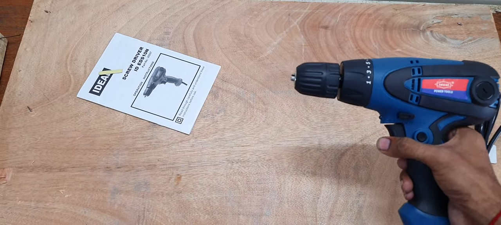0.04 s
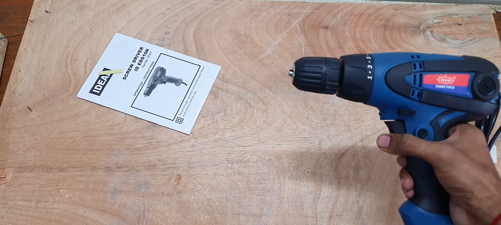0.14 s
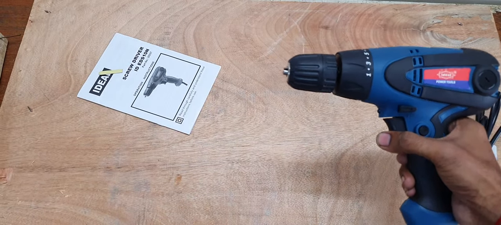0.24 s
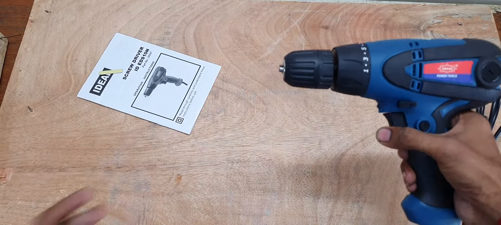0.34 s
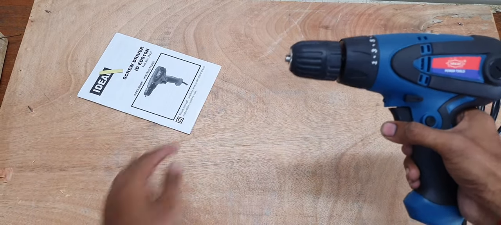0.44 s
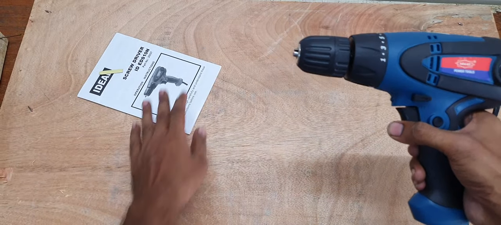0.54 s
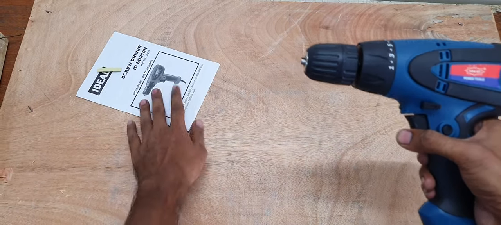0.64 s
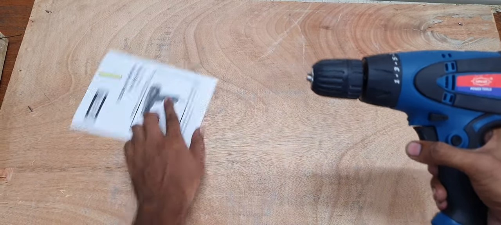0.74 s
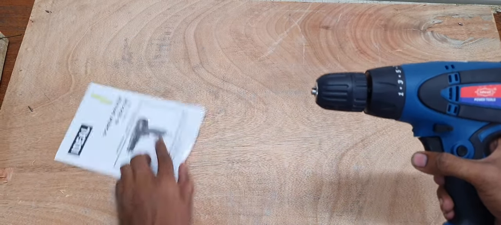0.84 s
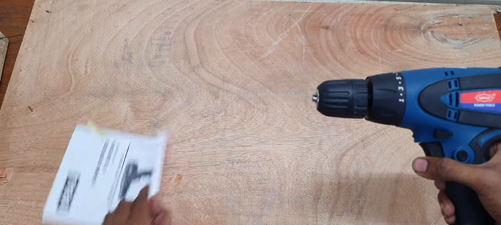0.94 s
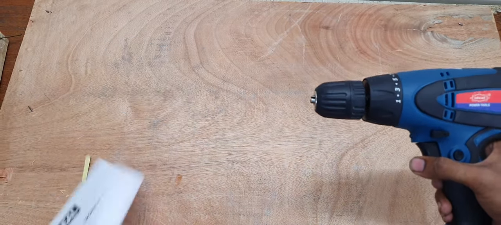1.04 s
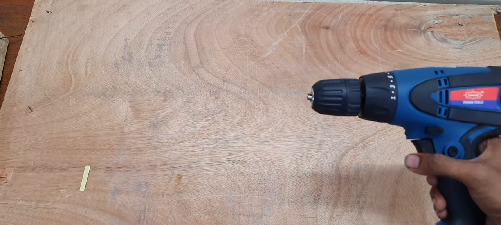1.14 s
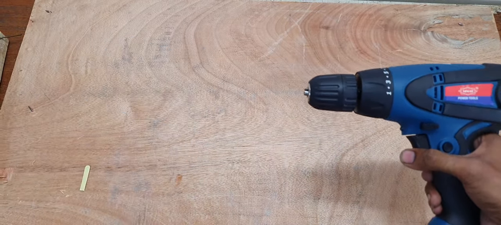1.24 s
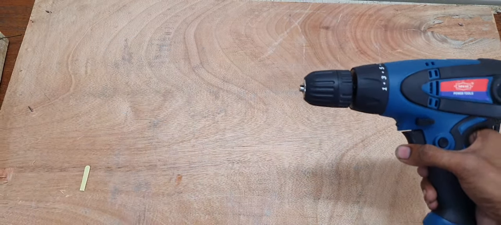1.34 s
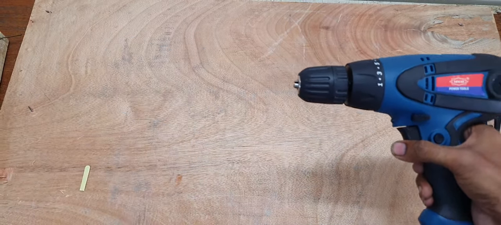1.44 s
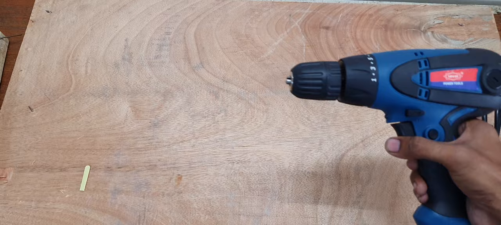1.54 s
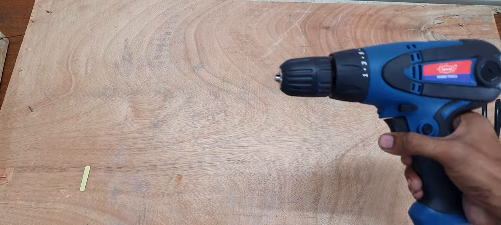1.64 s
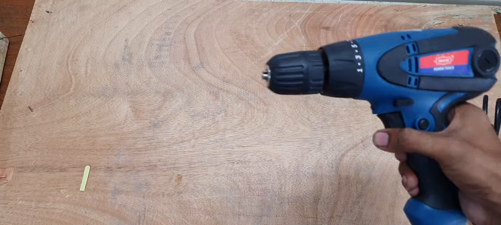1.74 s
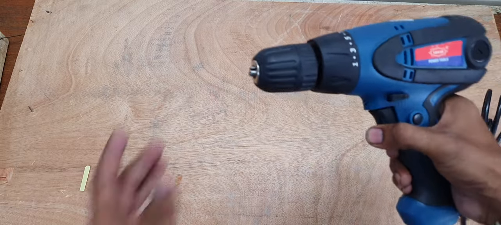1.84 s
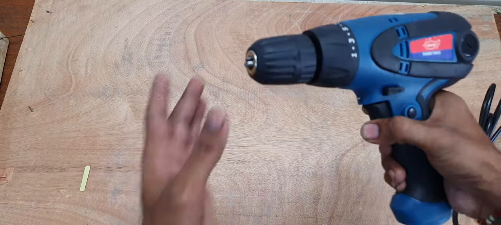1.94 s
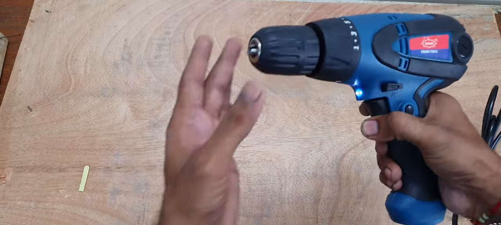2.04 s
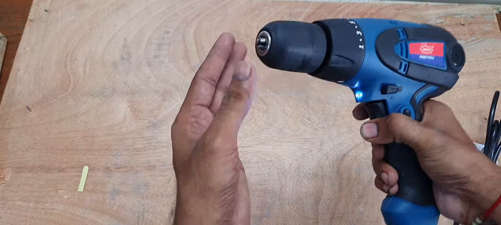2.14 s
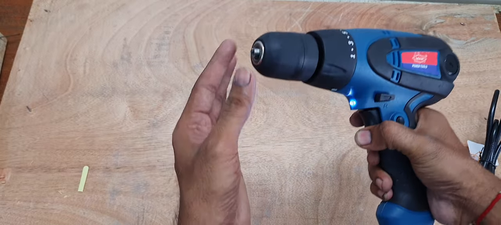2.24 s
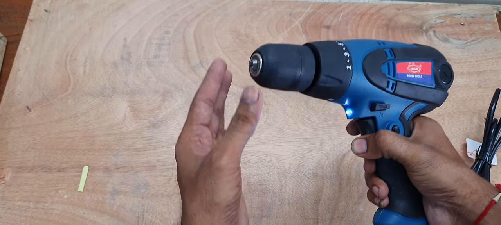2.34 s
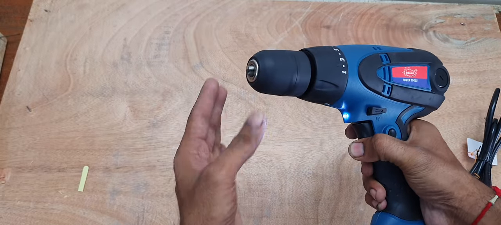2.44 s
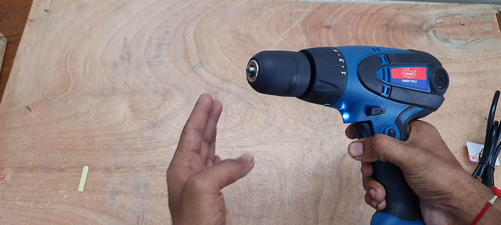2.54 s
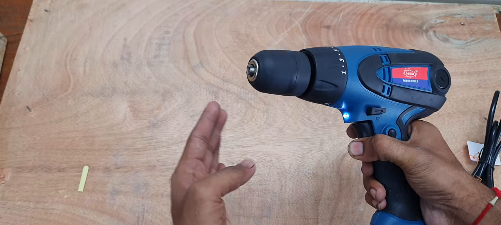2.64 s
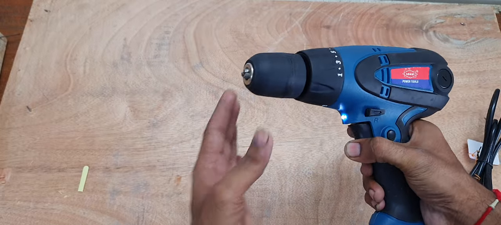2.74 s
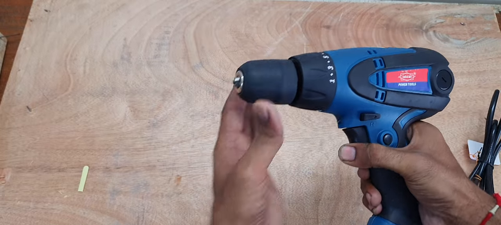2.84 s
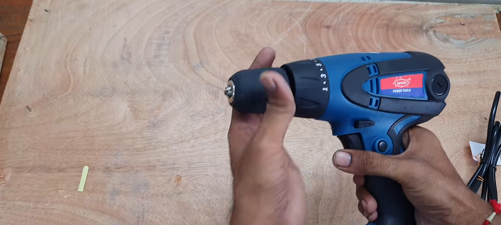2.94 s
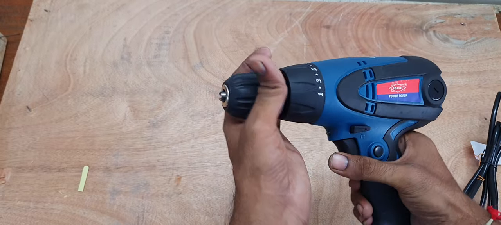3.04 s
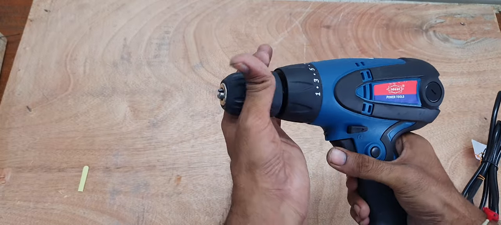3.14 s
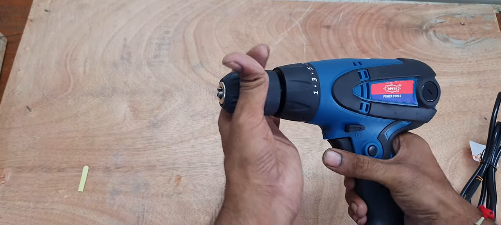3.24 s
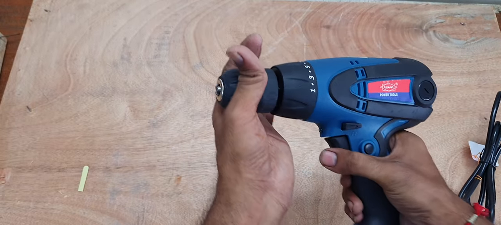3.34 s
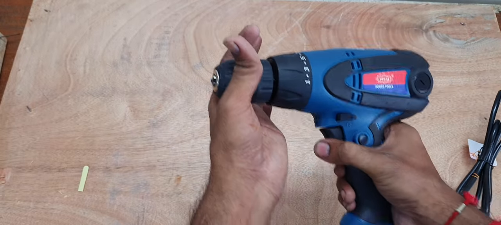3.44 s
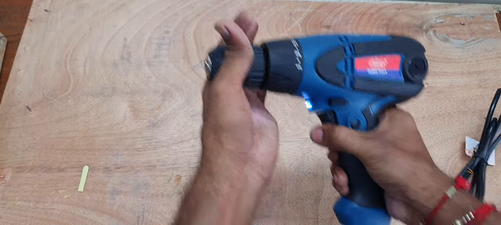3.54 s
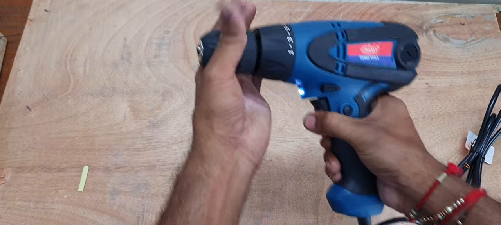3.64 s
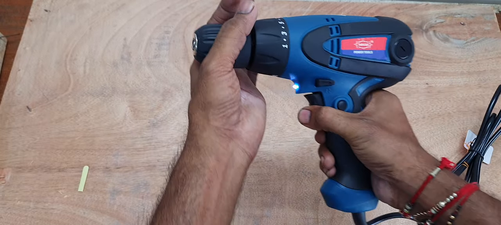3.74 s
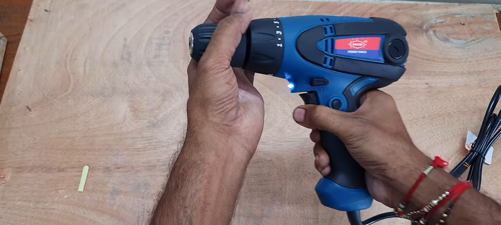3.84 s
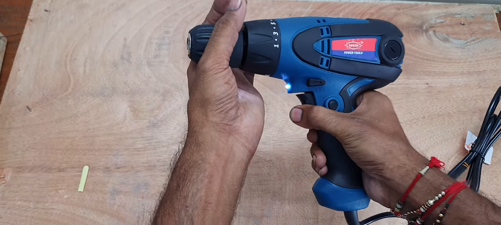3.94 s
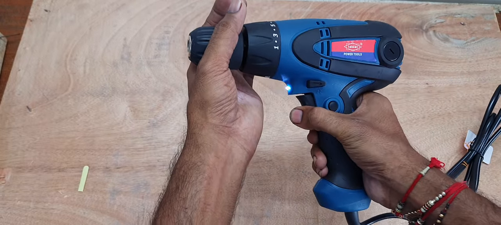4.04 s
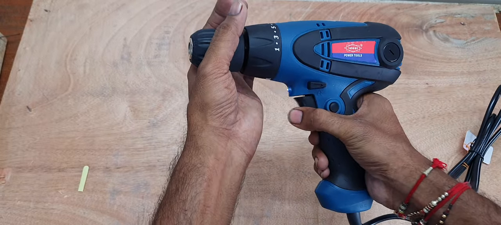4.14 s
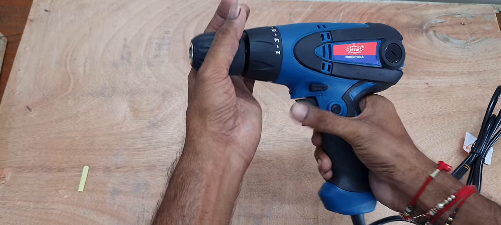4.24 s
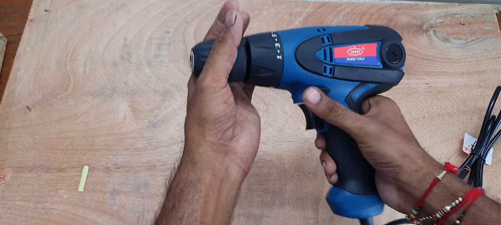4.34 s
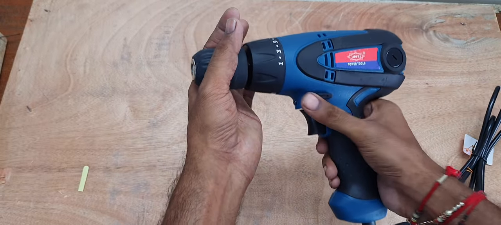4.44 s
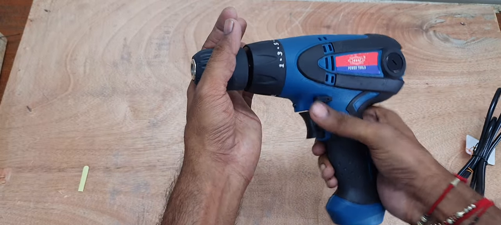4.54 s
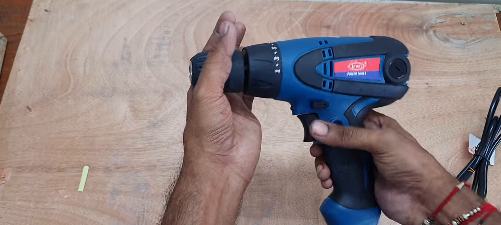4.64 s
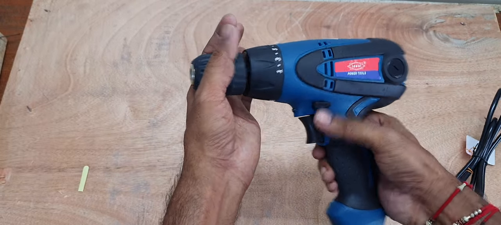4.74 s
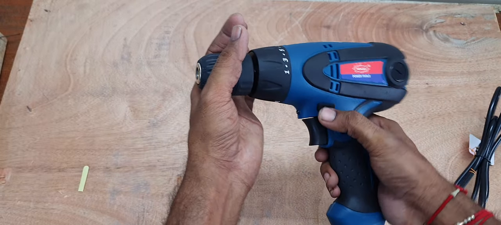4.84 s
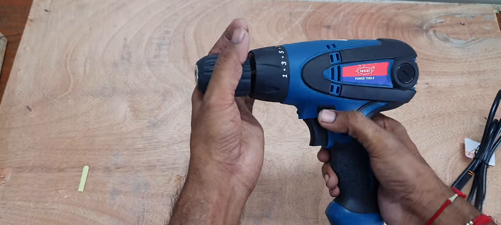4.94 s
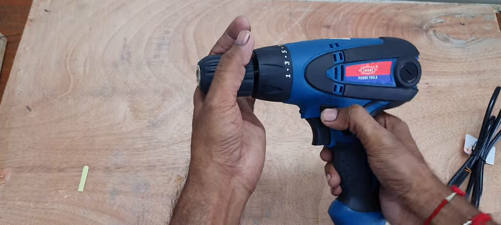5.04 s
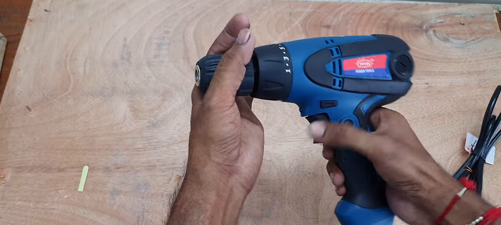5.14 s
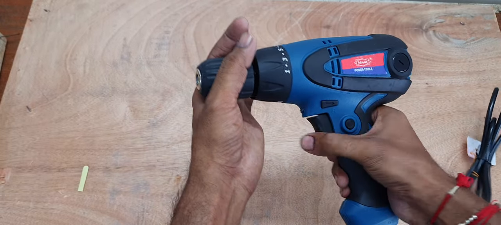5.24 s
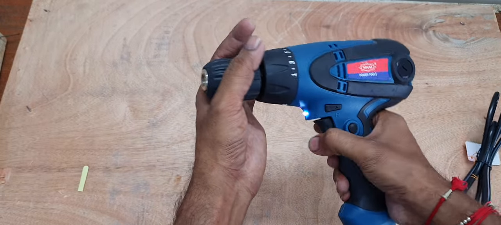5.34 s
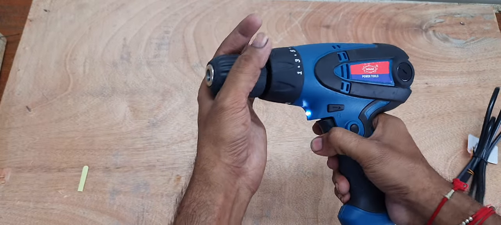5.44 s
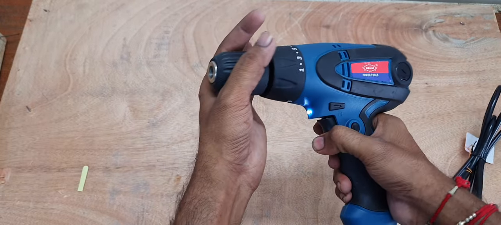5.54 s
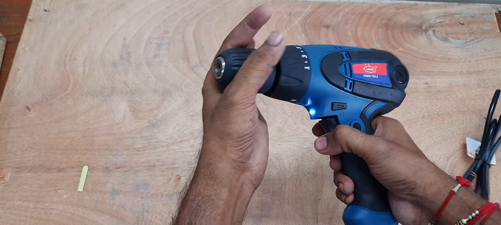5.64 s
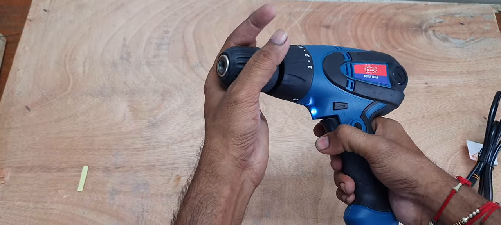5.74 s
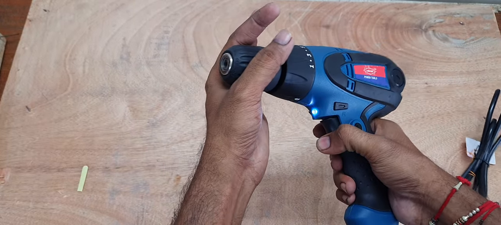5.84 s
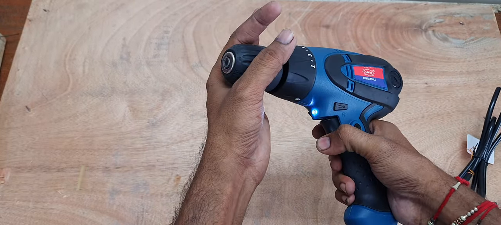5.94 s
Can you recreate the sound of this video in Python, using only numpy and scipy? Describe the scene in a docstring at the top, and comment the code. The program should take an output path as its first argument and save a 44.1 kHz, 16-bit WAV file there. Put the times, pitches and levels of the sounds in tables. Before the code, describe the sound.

A small room rumbles low and steadily throughout. From about 0.2 to 0.5 seconds, a quick cluster of dull knocks rings a wooden table. A paper leaflet slides with a grainy hiss from 0.7 seconds and snaps near 1 second, with faint handling clicks around 1.8.

At 2.1 seconds a trigger clicks and a nearby corded drill spins up without load: a rising, pulsing motor whine with rasping gears, hiss and rushing air. Released at 2.8, it coasts down into a duller rattle. A second, slower burst runs from 3.6 to 4.2 seconds, then winds down to a stop at about 5, leaving a faint thin squeal around standstill. Near 5.4 seconds a light click starts the third burst, the fastest and highest in pitch, which is still running when the sound ends at 6 seconds.

```python
"""A small room rumbles throughout. Dull knocks ring a wooden table, then a paper leaflet slides and snaps.
A corded drill-driver, held over the table, is triggered three times without load: gear teeth rasp,
brushes hiss, the fan rushes and the motor whines in mains pulses. It coasts after the first two pulls,
leaving a thin squeal around standstill. The third pull is the fastest and runs to the end."""
import sys
import numpy as np
from scipy import signal
from scipy.fft import rfft, irfft
from scipy.io import wavfile
from scipy.ndimage import map_coordinates

SR = 44100
rng = np.random.default_rng(int(sys.argv[2]) if len(sys.argv) > 2 else 0)


def put_to_file(sound):
    """Save the sound as 16-bit audio at rate SR, in the file named by the first command-line argument."""
    columns = np.atleast_2d(sound).T  # one column per channel
    safe = np.clip(columns, -1, 1)
    whole_steps = np.round(safe * 32767)
    wavfile.write(sys.argv[1], SR, whole_steps.astype(np.int16))


N = 263277
TIME = np.arange(N) / SR
FREQS = np.maximum(np.arange(N // 2 + 1) * SR / N, 1)
MESH_PER_TURN = 7.5

# trigger pulls: press_s, release_s, aim_rps, spin_up_s, squeeze_s
TRIGGER_PULLS = [(2.09, 2.761, 308.5, .24, .002), (3.56, 4.156, 255, .231, .017),
                 (5.374, 6.0, 436, .18, .034)]
# fixed peaks and dips that give the drill its hollow tone: centre_hz, width_hz, lift_db
DRILL_COLOUR = [(930, 35, 6), (2370, 460, 1), (3010, 140, 5), (3340, 260, 0), (3820, 360, 5.5),
                (4300, 230, -2), (5800, 350, 2), (7000, 430, -1)]


def from_db(db):
    """Decibels to gain."""
    return 10 ** (np.asarray(db) / 20)


def rms_one(x):
    """Scale to rms 1."""
    return x / np.sqrt(np.mean(x ** 2) + 1e-20)


def response(spectrum, peaks=()):
    """Gain per frequency: a smooth spectrum plus peaks and dips, rolled off past both ends."""
    hz, db = np.transpose(spectrum)
    smooth_db = np.interp(np.log(FREQS), np.log(hz), db)
    lift_db = sum(lift / (1 + (2 * (FREQS - centre) / width) ** 2) for centre, width, lift in peaks)
    roll_off = np.minimum(FREQS / hz[0], 1) ** 2 * np.minimum(hz[-1] / FREQS, 1) ** 2
    return from_db(smooth_db + lift_db) * roll_off


def colour(x, gain):
    """Filter by a gain per frequency."""
    return irfft(rfft(x) * gain, N)


def band(x, hz, kind):
    """Second-order Butterworth filter."""
    sos = signal.butter(2, np.clip(hz, 10, .45 * SR), kind, fs=SR, output="sos")
    return signal.sosfilt(sos, x + 1e-18)


def drift(rate_hz):
    """Random wander, rms 1."""
    return rms_one(colour(rng.standard_normal(N), 1 / (1 + (FREQS / rate_hz) ** 2)))


def saturate(speed_rps, knee_rps):
    """Grows with speed, levels off at 1 above the knee."""
    return speed_rps / np.hypot(speed_rps, knee_rps)


def room_rumble(level_db=-38, pan_db=2.0):
    """Steady rumble: alike at both microphones in the bass, less so in the treble."""
    # background spectrum: freq_hz, level_db
    spectrum = [(15, -46), (25, -39), (47, -2.5), (74, 0), (180, -12), (242, -14.5), (285, -13.5),
                (335, -15), (476, -15.5), (1070, -22.5), (1230, -26.5), (1560, -27.5), (2990, -30.5),
                (7110, -42.5), (16000, -49.5)]
    # standing waves: centre_hz, width_hz, lift_db
    room_modes = [(76.4, 33, 2.5), (106, 13, 5), (194, 79, -7), (280.4, 23, 6.5), (405, 12.6, 7.5),
                  (490, 14.5, 6), (568, 24, 2)]
    gain = response(spectrum, room_modes)
    spread = 0.063 + 1.6 * FREQS / (FREQS + 1200)
    mid = colour(rng.standard_normal(N), gain)
    side = colour(rng.standard_normal(N), gain * spread)
    stereo = (mid + side * [[1], [-1]]) / mid.std()
    return from_db(level_db) * stereo * from_db([[pan_db / 2], [-pan_db / 2]])


def knocks(gain_db=-2.0, crack_db=-4.5, crack_s=0.039, thump_db=-19.5, thump_hz=95, thump_s=0.025):
    """Soft blows ring the table's modes, each in its own mix, over a low thump and a dying crack."""
    # blows on the table: start_s, level_db, brightness_hz
    blows = [(0.181, -7, 880), (.201, -6.5, 557), (.263, -16, 1900), (.277, -22, 2400), (.309, -11, 520),
             (.375, -21.5, 805), (.425, -12, 980), (.446, -19.5, 1300), (0.492, -19, 600),
             (0.513, -26.5, 1800)]
    # wood modes: pitch_hz, level_db, t60_s
    table_modes = [(115, -19, 0.19), (271.3, -9.5, 0.17), (356, -4.5, 0.033), (393, -6, 0.066),
                   (463, -6, 0.053), (556.7, -8, 0.12), (674, -12, 0.033), (825, -15, 0.023),
                   (970, -5, 0.021), (1230, -10.5, 0.071), (1520, -13, 0.043), (1805, -8.5, 0.057),
                   (2160, -26, 0.049), (2745, -29, 0.045)]
    # contact crack: freq_hz, level_db
    crack_spectrum = [(60, -4), (120, 11.5), (190, -20), (300, 10.5), (1500, -1), (2300, -7.5),
                      (3200, -11.5), (5000, -19.5), (8000, -29.5), (15000, -30)]
    t, body, cracks = TIME[:SR // 2], np.zeros(N), np.zeros(N)
    hz, mode_db, t60_s = np.transpose(table_modes)[:, :, None]
    polarity = (-1) ** np.arange(len(hz))[:, None]
    thump = from_db(thump_db) * np.sin(2 * np.pi * thump_hz * t) * np.exp(-t / thump_s)
    for start_s, level_db, brightness_hz in blows:
        strength = polarity * from_db(mode_db + rng.normal(0, 2.7, hz.shape))
        ring = np.sum(strength * from_db(-60 * t / t60_s) * np.sin(2 * np.pi * hz * t), axis=0)
        burst = rng.standard_normal(len(t)) * np.exp(-t / crack_s)
        span = slice(int(start_s * SR), int(start_s * SR) + len(t))
        body[span] += from_db(level_db) * (band(ring, brightness_hz, "low") + thump)
        cracks[span] += from_db(level_db + crack_db) * brightness_hz / 1000 * burst
    return from_db(gain_db) * (body + colour(cracks, response(crack_spectrum)))


def snaps(decay_s=0.0039, gain_db=4.0):
    """Paper snaps and the grip clicks: short broad noise bursts."""
    # snaps and clicks: start_s, level_db, centre_hz
    clicks = [(.262, -34, 9000), (0.859, -29.5, 6100), (0.906, -31.5, 2000), (0.978, -20, 1710),
              (1.188, -39.5, 5970), (1.778, -37, 3500), (1.823, -35.5, 2660), (2.091, -31, 3930),
              (5.373, -39, 1200)]
    t, out = TIME[:SR // 10], np.zeros(N)
    for start_s, level_db, centre_hz in clicks:
        burst = rng.standard_normal(len(t)) * np.exp(-t / decay_s)
        crack = band(burst, [centre_hz / 2, centre_hz * 1.32], "band")
        start = int(start_s * SR)
        out[start:start + len(t)] += from_db(level_db + gain_db) * crack / np.abs(crack).max()
    return out


def paper_slide(grain_db=3.5, attack_s=.04, release_s=0.024):
    """Paper and skin slide with a grainy hiss; each stroke swells, holds and dies away."""
    # sliding strokes: start_s, length_s, level_db
    strokes = [(0.727, 0.13, -39), (0.884, 0.1, -39), (1.133, 0.034, -43), (1.783, 0.19, -56.5)]
    # paper friction: freq_hz, level_db
    spectrum = [(900, 10.5), (2000, 3.5), (3200, 5), (4500, 7.5), (6600, 8), (8000, -2), (11000, -0.5),
                (15500, 3)]
    envelope = np.zeros(N)
    for start_s, length_s, level_db in strokes:
        swell = np.clip((TIME - start_s) / attack_s, 0, 1)
        fade = np.exp(-np.maximum(TIME - start_s - length_s, 0) / release_s)
        envelope += from_db(level_db) * swell * fade
    grains = rng.standard_normal(N) * from_db(grain_db * drift(240))
    return envelope * rms_one(colour(grains, response(spectrum)))


def motor(friction_rps_per_s=215.3, drag_per_s=.59, full_throttle_rps=304, current_lag_s=0.041):
    """Pulls spin the shaft up; friction and drag brake it. Returns speed, current and starting surge."""
    speed_rps, current, surge = np.zeros((3, N))
    brake_rps = friction_rps_per_s / drag_per_s
    for press_s, release_s, aim_rps, spin_up_s, squeeze_s in TRIGGER_PULLS:
        held_s = np.clip(TIME - press_s, 0, release_s - press_s)
        driven_s = held_s - squeeze_s * (1 - np.exp(-held_s / squeeze_s))
        coast_s = np.maximum(TIME - release_s, 0)
        start_rps = np.interp(press_s, TIME, speed_rps)
        driven_rps = aim_rps + (start_rps - aim_rps) * np.exp(-driven_s / spin_up_s)
        braked_rps = (driven_rps + brake_rps) * np.exp(-drag_per_s * coast_s) - brake_rps
        speed_rps = np.where(TIME > press_s, np.maximum(braked_rps, 0), speed_rps)
        throttle = min(aim_rps / full_throttle_rps, 1) ** 3.9 * (TIME > press_s) * (TIME < release_s)
        current += throttle
        surge += throttle * (1 - speed_rps / aim_rps)
    pole = np.exp(-1 / (current_lag_s * SR))
    current, surge = signal.lfilter([1 - pole], [1, -pole], np.array([current, surge]) + 1e-18)
    return speed_rps, current, surge


def mains_pulses(mains_hz=50, sharpness=3.6, earliest_s=.007, retard_s=.018, full_wave_rps=370):
    """The trigger chops the mains: one strong pulse a cycle, later at light throttle; two wide open."""
    pulses = np.zeros(N)
    wide_open_rps = max(pull[2] for pull in TRIGGER_PULLS)
    for press_s, _, aim_rps, _, _ in TRIGGER_PULLS:
        firing_s = earliest_s + retard_s * (1 - aim_rps / wide_open_rps)
        wave = np.cos(2 * np.pi * mains_hz * (TIME - firing_s))
        first_half = np.exp(sharpness * (wave - 1))
        second_half = (0.63 if aim_rps > full_wave_rps else .08) * np.exp(sharpness * (-wave - 1))
        pulses = np.where(TIME > press_s, first_half + second_half, pulses)
    return pulses


def gear_rasp(turns, speed_rps, sharpness=1.4, uneven_db=1.2, soft_above_hz=4830, soft_below_rps=57):
    """Teeth scrape as they meet: merged at speed, a duller ringing rattle as the shaft slows."""
    # tooth scrape: freq_hz, level_db
    spectrum = [(300, -68), (900, -30.5), (1500, -36), (2000, -7.5), (3000, -6.5), (4200, -3.5),
                (5300, -2.5), (6900, 2.5), (7500, -4.5), (8200, -10), (12000, -37)]
    # gear case ring at low speed: centre_hz, width_hz, lift_db
    slow_ring = [(3670, 1100, 5.6)]
    teeth = np.exp(sharpness * (np.cos(2 * np.pi * MESH_PER_TURN * turns) - 1))
    bite = 1 + 0.043 * np.cos(np.pi * MESH_PER_TURN * turns)   # every other tooth bites harder
    runout = 1 + 0.098 * np.cos(2 * np.pi * turns)   # the pinion presses harder once a turn
    force = rms_one((1 + teeth * bite) * runout * from_db(uneven_db * drift(150)))
    scrape = rms_one(colour(force * rng.standard_normal(N), response(spectrum, DRILL_COLOUR)))
    dull = colour(scrape, response([(20, 0), (soft_above_hz, 0)], slow_ring))
    return dull + saturate(speed_rps, soft_below_rps) * (scrape - dull)


def gear_tones(turns, current, pace):
    """The mesh sings in harmonics, blurred under drive, clearest in a slow coast."""
    # mesh tones: cycles_per_turn, level_db
    partials = [(7.5, -19), (11.25, -17), (15, -11), (18.75, -15), (22.5, -8), (26.25, -13), (30, -9),
                (33.75, -14), (37.5, -11), (45, -12)]
    # gear case radiation: freq_hz, gain_db
    gear_case = [(500, -22), (1400, -8), (2200, -2.5), (3300, -1), (4500, -2), (6300, -1.5), (9000, -17)]
    tones = np.zeros(N)
    for per_turn, level_db in partials:
        backlash_cycles = (.05 + .1 * current) * drift(70) + .13 * drift(15)
        gain = from_db(level_db + 2 * drift(39))
        tones += gain * np.sin(2 * np.pi * (per_turn * turns + backlash_cycles))
    clarity_db = .5 - 1.5 * current - 2 * pace
    return colour(tones, response(gear_case)) * from_db(clarity_db)


def brush_hiss(turns, flicker_db=4.0):
    """Sparking brushes hiss, flickering and pulsing at the mesh rate."""
    # brush noise: freq_hz, level_db
    spectrum = [(5000, -0.5), (7500, -32), (8200, -0.5), (9200, 3.5), (10700, 5), (12800, 4.5),
                (14300, 2.5), (16000, -0.5)]
    sparks = rng.standard_normal(N) * from_db(flicker_db * drift(440))
    ripple = 1 + 0.83 * np.cos(2 * np.pi * MESH_PER_TURN * turns)
    return rms_one(colour(sparks * ripple, response(spectrum)))


def magnetic_whine(turns, speed_rps, pulses, gain_db=-17.5, slots=12, remanence=0.049):
    """Armature slots pass poles that pulse with the current and stay faintly magnetic while coasting."""
    # motor can radiation: freq_hz, gain_db
    motor_can = [(500, -13), (1800, -16), (2400, -4.5), (2850, 3.5), (3150, 0.5), (3500, -8), (4400, -2),
                 (5200, -9)]
    slot_tone = np.sin(2 * np.pi * (slots * turns + 0.11 * drift(54)))
    force = (pulses + remanence) * slot_tone * saturate(speed_rps, knee_rps=140)
    return from_db(gain_db) * colour(force, response(motor_can))


def shaft_tones(turns, pace, hum_db=-39.5, whistle_db=-31, whistle_per_turn=34.1):
    """Imbalance hum and a high whistle, both growing steeply with speed."""
    hum = from_db(hum_db) * np.sin(2 * np.pi * turns)
    whistle = from_db(whistle_db) * np.sin(2 * np.pi * (whistle_per_turn * turns + 0.16 * drift(45)))
    return pace ** 4 * (hum + whistle)


def fan(turns, pace, rush_db=-29.5, swish_db=-34.5, swish_per_turn=3.2, swish_width_hz=240):
    """Air rushes through the housing; a broad swish climbs with speed."""
    # air noise: freq_hz, level_db
    spectrum = [(200, -32), (400, -27), (550, -2.5), (720, -5.5), (950, 1), (1250, 3), (1550, -0.5),
                (2100, 1.5), (3500, -19.5)]
    rush = rms_one(colour(rng.standard_normal(N), response(spectrum, DRILL_COLOUR)))
    swish = drift(swish_width_hz) * np.sin(2 * np.pi * swish_per_turn * turns)
    return from_db(rush_db) * pace ** 1.22 * rush + from_db(swish_db) * pace ** 2.3 * swish


def drill(speed_rps, current, surge, gears_db=-26, brushes_db=-29, throb_depth=0.37):
    """All parts follow one shaft; gears and brushes grow louder with speed, current and surge."""
    # gear case and brush vents as the tool turns in the hand: time_s, gears_db, vents_db
    facing = [(2.2, .5, 2), (2.7, -1.5, 1), (3.3, -.5, 0), (3.8, 0, 0), (4.4, 0.9, 1), (4.85, 1.5, -0.5),
              (5.5, 0.3, -2), (5.95, 1.5, -1)]
    facing_s, *facing_db = np.transpose(facing)
    gears_facing, vents_facing = (from_db(np.interp(TIME, facing_s, db)) for db in facing_db)
    pace = speed_rps / speed_rps.max()
    turns = np.cumsum(speed_rps) / SR
    pulses = current * mains_pulses()
    gear_gain = from_db(gears_db + 0.35 * current + 4.5 * surge) * saturate(speed_rps, 109.5) ** 0.98
    brush_gain = from_db(brushes_db + .3 * current + 6.5 * surge) * saturate(speed_rps, 140) ** 1.47
    gears = gears_facing * gear_gain * (gear_rasp(turns, speed_rps) + gear_tones(turns, current, pace))
    brushes = vents_facing * brush_gain * brush_hiss(turns)
    throb = 1 + throb_depth * (pulses - current / 3)
    whine = magnetic_whine(turns, speed_rps, pulses)
    return (gears + brushes) * throb + whine + shaft_tones(turns, pace) + fan(turns, pace)


def table_echo(x, strength=0.16, dull_hz=7000, delay_ms=0.902, sway_ms=0.092):
    """The table returns a late copy: a hollow comb that shifts as the hand sways."""
    delay_s = (delay_ms + sway_ms * drift(0.83)) / 1000
    dulled = colour(x, 1 / (1 + (FREQS / dull_hz) ** 4))
    return x + strength * np.interp(TIME - delay_s, TIME, dulled)


def squeal(speed_rps, gain_db=4.0, below_rps=22):
    """A thin squeal catches and lets go once the motor has run down."""
    # squeal lines: pitch_hz, level_db
    partials = [(3009, -77), (3435, -57), (4290, -83), (4716, -79), (5136, -81)]
    tones = sum(from_db(db) * np.sin(2 * np.pi * (hz * TIME + 0.17 * drift(31))) for hz, db in partials)
    flutter_db = np.minimum(5 * drift(35), 5)
    first_release_s = TRIGGER_PULLS[0][1]
    run_down = (TIME > first_release_s) * np.exp(-(speed_rps / below_rps) ** 2)
    return from_db(gain_db + flutter_db) * run_down * tones


def place(x, pan_db, lag_samples, wet_db, treble_db=7.0, t60_s=0.26, sway_s=.00022):
    """Direct sound reaches one microphone later; the room tail is richest in treble beamed elsewhere."""
    t = TIME[:SR // 2]
    tail = rng.standard_normal((2, len(t))) * from_db(-60 * t / t60_s) * (t > .003)
    tail /= np.sqrt(np.sum(tail ** 2, axis=1, keepdims=True))
    bass = band(tail, 560, "low")
    treble = band(tail, 720, "high") + from_db(treble_db) / 2 * band(tail, 2460, "high")
    tail = treble + 1.25 * bass[0] + 0.19 * bass[1] * [[1], [-1]]   # long waves reach both sides alike
    direct = np.array([colour(x, np.exp(-2j * np.pi * FREQS * lag_samples / SR)), x])
    wet = signal.fftconvolve(x[None], tail, axes=1)[:, :N]
    # moving hands shift the reflected paths
    wet = np.array([map_coordinates(side, [(TIME + sway_s * drift(4.01)) * SR], order=3) for side in wet])
    return (direct + from_db(wet_db) * wet) * from_db([[pan_db / 2], [-pan_db / 2]])


def scene():
    """Table, leaflet and drill in the room, in stereo."""
    speed_rps, current, surge = motor()
    tool = table_echo(drill(speed_rps, current, surge)) + squeal(speed_rps)
    tool = place(tool, pan_db=2.5, lag_samples=1.3, wet_db=-4.0)
    table = place(knocks(), pan_db=4.0, lag_samples=-6.0, wet_db=-6.5)
    handling = place(paper_slide() + snaps(), pan_db=3.0, lag_samples=-1.06, wet_db=-2.5)
    return room_rumble() + table + handling + tool


def record(dry):
    """Steep low-pass."""
    cutoff_hz = 15900
    return colour(dry, 1 / np.sqrt(1 + (FREQS / cutoff_hz) ** 300))


dry = scene()
out = record(dry)
put_to_file(out)
```